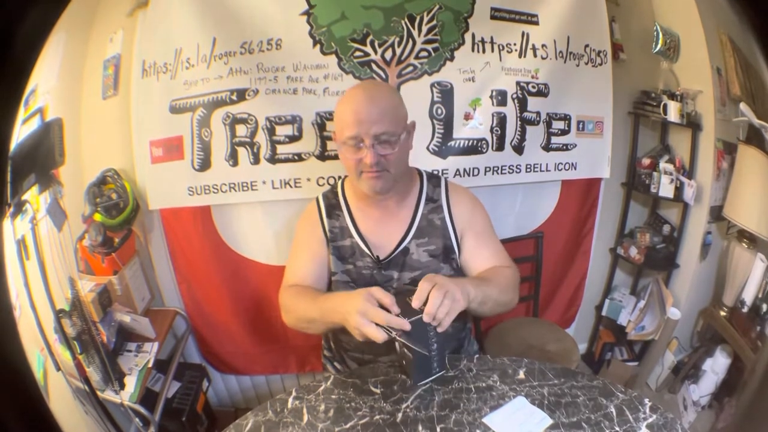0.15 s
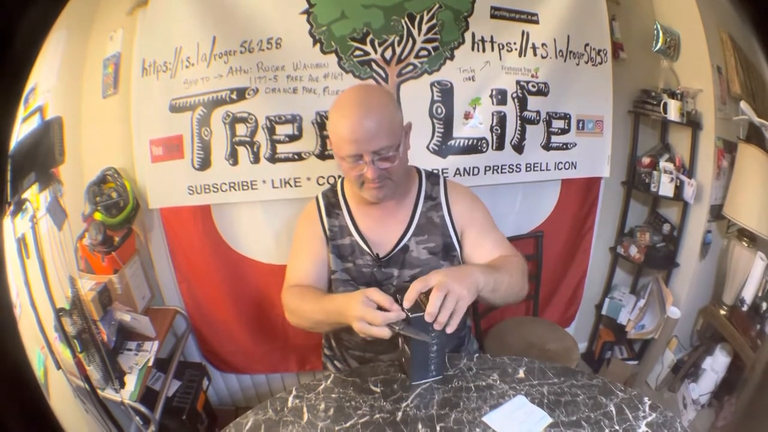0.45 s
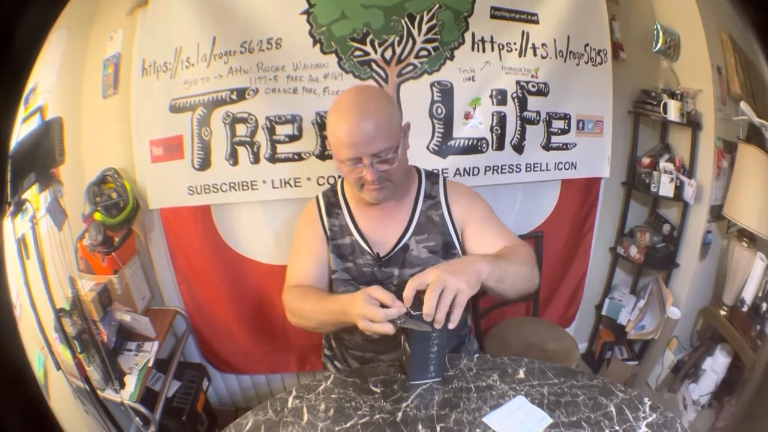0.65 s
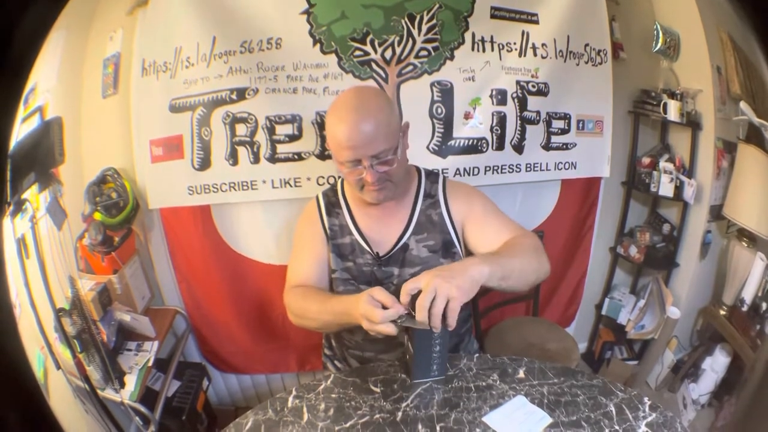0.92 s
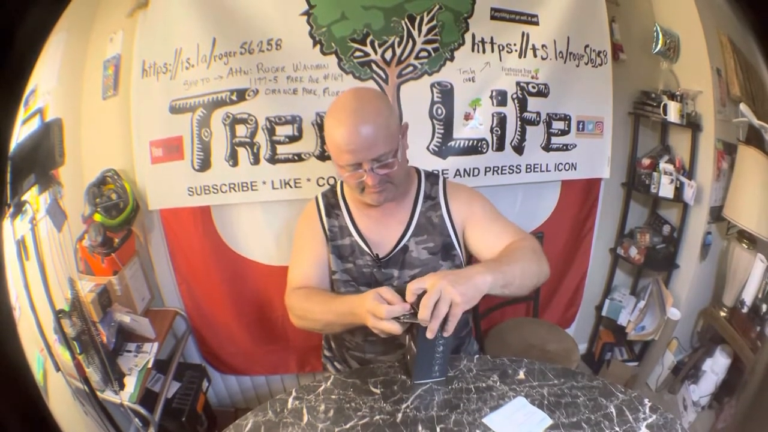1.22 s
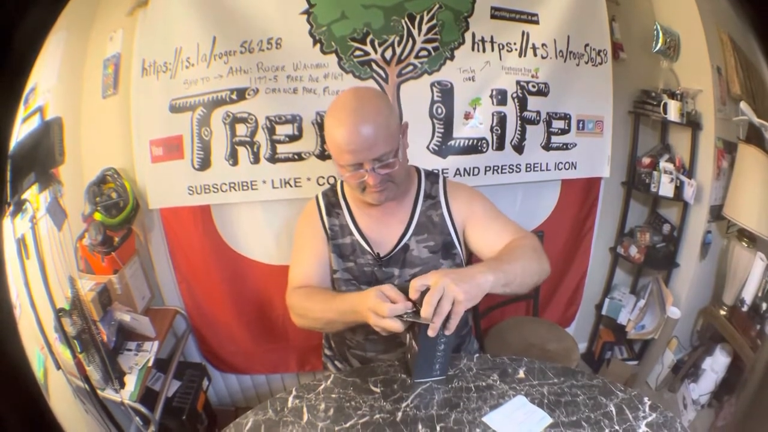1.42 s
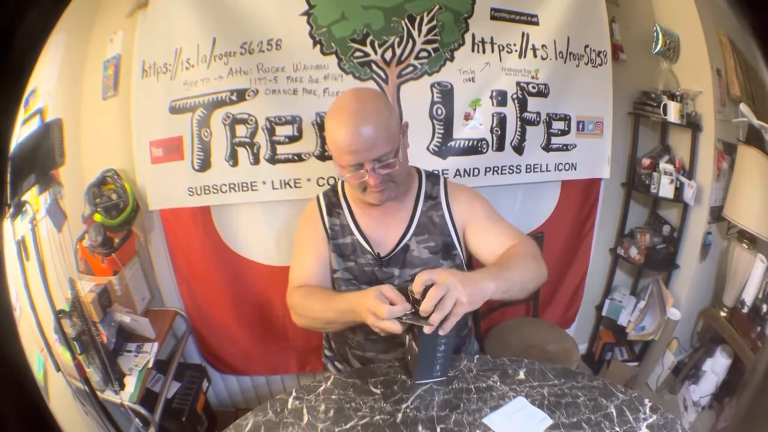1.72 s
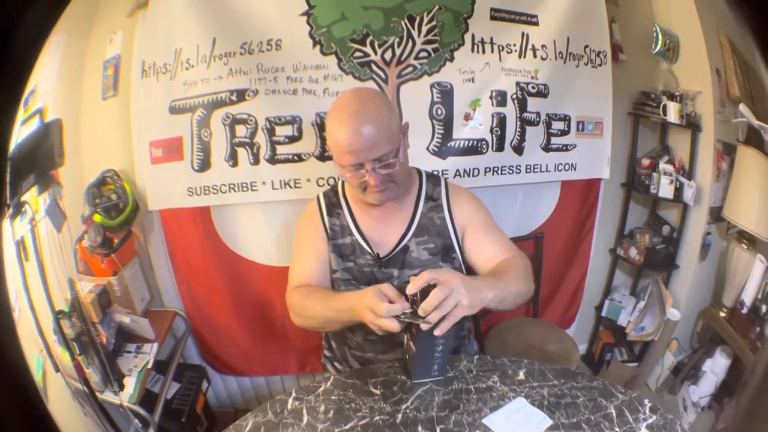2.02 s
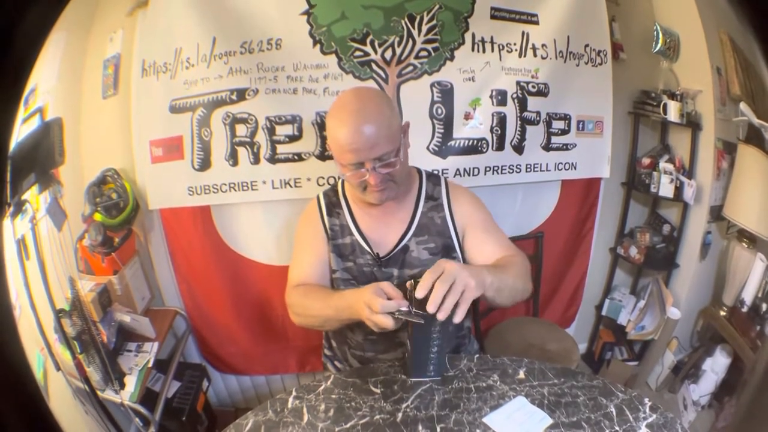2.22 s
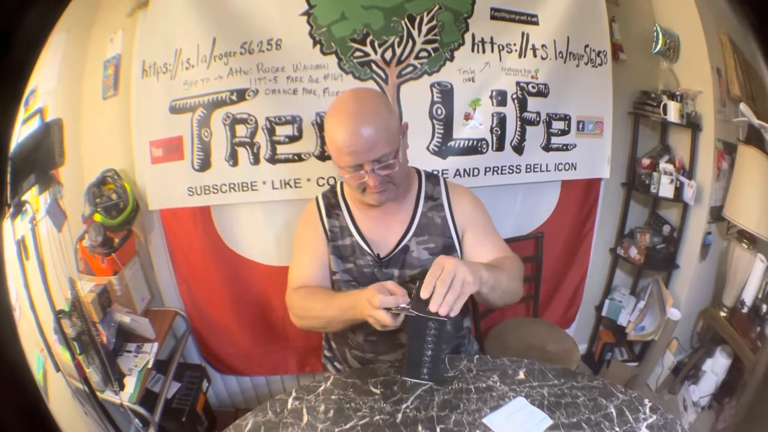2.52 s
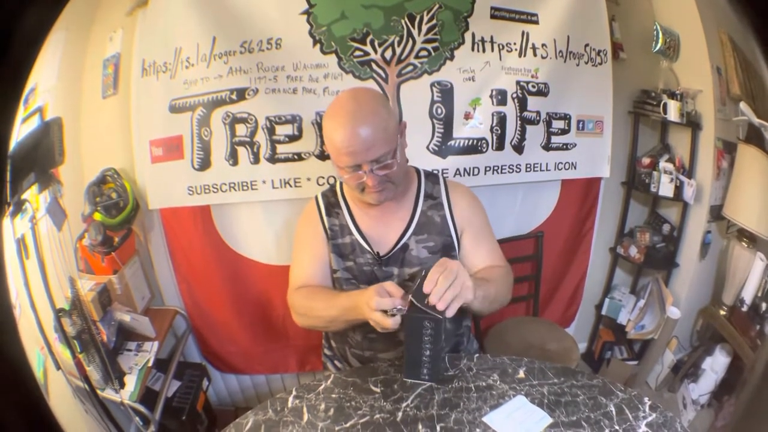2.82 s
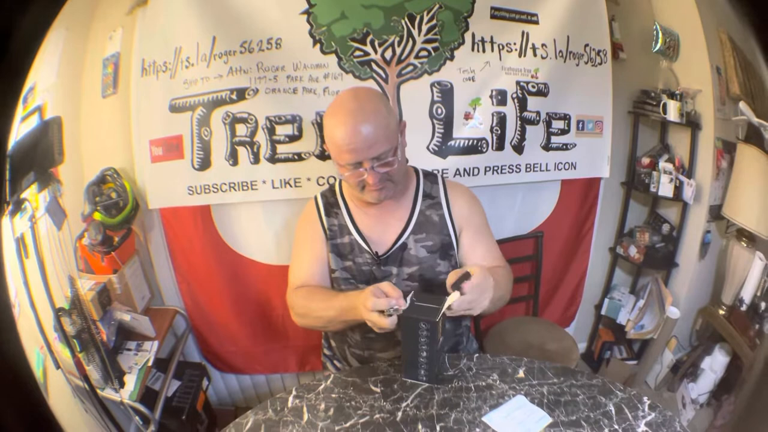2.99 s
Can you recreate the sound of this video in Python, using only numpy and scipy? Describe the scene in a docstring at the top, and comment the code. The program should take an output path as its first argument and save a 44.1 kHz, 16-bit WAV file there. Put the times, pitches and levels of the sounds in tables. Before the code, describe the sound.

A blade scratches through the seal on a cardboard box in a small room, with dry clicks and soft knocks. Sharp snaps come midway and again near the end, over a low rumble and faint hiss.

```python
"""In a small furnished room, a small blade works through the seal of a cardboard box on a table.
The blade judders as it sticks and slips, scrapes as it breaks tiny fibres, and ticks as it catches.
The box knocks dully as it shifts in the hand. The seal gives in a cluster of sharp snaps,
and a last loud snap frees the flap. A low rumble and a faint hiss lie underneath."""
import sys
import numpy as np
from scipy import signal
from scipy.fft import rfft, irfft
from scipy.io import wavfile

SR = 44100
rng = np.random.default_rng(int(sys.argv[2]) if len(sys.argv) > 2 else 0)


def dump(signal):
    """Clip the signal to [-1, 1] and save it as 16-bit WAV at the path in sys.argv[1]."""
    limited = np.clip(np.atleast_2d(signal).T, -1, 1)
    pcm = np.round(limited * 32767).astype(np.int16)
    wavfile.write(sys.argv[1], SR, pcm)


N = 138915
LEAD_S = .008  # a faint crackle swells for this long before each click


def gain(db):
    """Turns decibels into a number to multiply by."""
    return 10 ** (np.asarray(db) / 20)


def unit_level(x):
    """Scales a sound to an average (rms) level of one."""
    return x / np.sqrt(np.mean(x ** 2) + 1e-20)


def look_up(table, hz):
    """Reads between a table's rows on a log scale of pitch."""
    pitches, values = np.transpose(table)
    return np.interp(np.log(abs(hz) + 1), np.log(pitches + 1), values)


def add(mix, start_s, sound):
    """Mixes a sound in at start_s."""
    at = round(start_s * SR)
    sound = sound[max(-at, 0):]
    part = mix[max(at, 0):][:len(sound)]
    part += sound[:len(part)]


def fade(t, fade_s):
    """Dies away, falling 60 dB in fade_s."""
    return np.exp(-np.log(1000) * t / fade_s)


def ring(hz, fade_s, rise_s=0.00011):
    """One tone that starts quickly and dies away."""
    t = np.arange(SR // 4) / SR
    return np.sin(2 * np.pi * hz * t) * fade(t, fade_s) * (1 - np.exp(-t / rise_s))


def click(tone, size=4096):
    """A sudden click with the lows and highs of a tone table."""
    log_gain = np.log(gain(look_up(tone, np.fft.fftfreq(size, 1 / SR))))
    spectrum = np.exp(np.conj(signal.hilbert(log_gain)))  # packs the energy at the start
    pulse = np.fft.ifft(spectrum).real[:size // 2]
    return pulse / abs(pulse).max()


def focus(x, hz=8600, boost_db=4, width_octaves=0.24):
    """The angle of the contact favours one band of the treble."""
    octaves = np.log2((np.fft.rfftfreq(len(x), 1 / SR) + 1) / hz)
    return irfft(rfft(x) * gain(boost_db * np.exp(-(octaves / width_octaves) ** 2)), len(x))


def crackle(fade_s, spray_share):
    """A brief crackle swells into a click and dies away."""
    t = np.arange(SR // 20) / SR - LEAD_S
    shape = np.where(t < 0, gain(-4) * fade(abs(t), 0.007), fade(abs(t), fade_s))
    spray = rng.standard_normal(len(t)) * shape
    spray *= np.sqrt(spray_share) / np.linalg.norm(spray)
    spray[np.argmin(abs(t))] += np.sqrt(1 - spray_share)  # the click
    return spray


# Tone of the background: pitch_hz, level_db
BACKGROUND_TONE = [(10, 0), (30, 3), (50, -13), (85, -19.5), (120, -16.5), (170, -19), (900, -34.5),
                   (2000, -40.5), (4200, -54), (8000, -53), (16000, -59)]

def background(level_db=-36, sway_db=1.5):
    """A swaying low rumble under faint steady hiss."""
    hz = np.fft.rfftfreq(N, 1 / SR)
    spectrum = rfft(rng.standard_normal(N)) * gain(look_up(BACKGROUND_TONE, hz))
    lows = 1 / (1 + (hz / 70) ** 4)
    sway = unit_level(irfft(rfft(rng.standard_normal(N)) * np.exp(-hz / 3), N))
    rumble = irfft(spectrum * lows, N) * gain(sway_db * sway)
    hiss = irfft(spectrum * (1 - lows), N)
    return gain(level_db) * unit_level(rumble + hiss)


# The room's echo tail: pitch_hz, fade_s, level_db
ROOM_TAIL = [(150, 0.17, 1.5), (510, 0.31, 6.5), (1420, 0.25, -2.5), (3600, 0.27, 4), (6900, 0.29, -8.5),
             (15000, 0.2, 1.5)]

def room(x, early_db=-14, tail_db=-13.5):
    """Table and walls throw back early echoes, then a short tail."""
    size = SR // 2
    t = np.arange(size) / SR
    early, tail = rng.standard_normal((2, size)) * (t > 0.003)  # silent until the first echo
    early *= fade(t, 0.039)
    hz, times, bands = signal.stft(tail, SR, nperseg=256)
    fade_s, level_db = (look_up(np.array(ROOM_TAIL)[:, [0, k]], hz)[:, None] for k in (1, 2))
    tail = signal.istft(bands * gain(level_db) * fade(times, fade_s), SR)[1][:size]
    echoes = gain(early_db) * early / np.linalg.norm(early) + gain(tail_db) * tail / np.linalg.norm(tail)
    return signal.fftconvolve(x, echoes)[:N]


# Tone of a dull knock: pitch_hz, level_db
KNOCK_TONE = [(40, -24), (150, -2.5), (480, 3.5), (850, -5), (1600, -1.5), (2800, -16.5), (5000, -24),
              (16000, -38)]
# Bumps of the box: start_s, level_db
BOX_BUMPS = [(0.329, -26), (0.333, -24.5), (.905, -14.5), (.912, -15), (1.797, -16.5)]

def knocks():
    """The box shifts in the hand and bumps dully."""
    out, knock = np.zeros(N), click(KNOCK_TONE)
    for start_s, level_db in BOX_BUMPS:
        add(out, start_s - LEAD_S, gain(level_db) * signal.fftconvolve(crackle(0.02, 0.84), knock))
    return out


# Tone of tapped card: pitch_hz, level_db
CARD_TONE = [(60, 3.5), (150, -10.5), (300, 3), (600, 6.5), (850, 0), (1200, 3.5), (2000, -4), (3100, -4),
             (4200, -16), (8000, -20), (16000, -62)]
# Notes the box rings at: pitch_hz, level_db, fade_s
BOX_NOTES = [(530, -21.5, 0.026), (600, -22.5, 0.026), (1095, -30.5, 0.13), (1560, -28.5, 0.0098),
             (1924, -25, 0.022), (2540, -30, 0.0081)]

def card_click():
    """The box answers one tap with a dry click and a faint ring."""
    tap = click(CARD_TONE, size=16384)
    for pitch_hz, level_db, fade_s in BOX_NOTES:
        add(tap, 0, gain(level_db) * ring(pitch_hz, fade_s))
    return tap / abs(tap).max()


# The gliding note of the pressed side of the box: time_s, pitch_hz
PANEL_GLIDE = [(.45, 1400), (.73, 1840), (1.01, 1210), (1.16, 1650), (1.57, 1120), (2.08, 1570),
               (2.8, 1300), (3.0, 1390)]

def panel(x, width_hz=264):
    """The pressed panel rings at a pitch that shifts with the grip and the place of the blade."""
    hz = np.interp(np.arange(N) / SR, *np.transpose(PANEL_GLIDE))
    spin = np.exp(2j * np.pi * np.cumsum(hz) / SR)
    decay = np.exp(-np.pi * width_hz / SR)
    # Shift the note down to 0 Hz, smooth away the rest, and shift it back.
    ringing = 2 * (spin * signal.lfilter([1 - decay], [1, -decay], x / spin)).real
    return gain(-3.5) * x + gain(4) * ringing


# Tone of the cut edge: pitch_hz, level_db
EDGE_TONE = [(300, -10), (2000, -8.5), (3300, -12), (4800, -6), (5500, 2), (8500, 3.5), (10500, 2.5),
             (12500, -9), (15000, -8.5), (17000, -63.5)]

def edge_click():
    """A fibre breaks at the cut edge with a bright click."""
    return click(EDGE_TONE)


# Notes the blade rings at: pitch_hz, level_db
BLADE_NOTES = [(2030, -0.5), (2750, -4.5), (3270, 2), (5200, 0.5), (5600, -5.5), (6400, -11.5),
               (7800, -4.5), (8450, -6.5)]

def blade(fade_s):
    """Bright notes ring: briefly, giving each slip of the judder the same treble colour, and longer when a snap
    frees the blade."""
    return sum(gain(level_db) * ring(pitch_hz, fade_s) for pitch_hz, level_db in BLADE_NOTES)


def grains(pressure, grain, per_s, spread_db=2.5):
    """Fibres break at random, a few of them large, all louder under more pressure."""
    sizes = gain(spread_db * np.minimum(rng.exponential(1, SR), 5))
    breaks = unit_level(sizes * rng.choice([-1, 1], SR) * (rng.random(SR) < per_s / SR))
    return signal.fftconvolve(pressure * breaks[:len(pressure)], grain / np.linalg.norm(grain))


# Strokes of the blade: start_s, length_s, peak_fraction, card_db, edge_db, treble_hz
BLADE_STROKES = [(-.05, 0.42, 0.24, -66, -54, 7150), (0.155, 0.1, 0.71, -43.5, -53.5, 7500),
                 (0.273, 0.16, 0.1, -50.5, -54.5, 8300), (0.391, 0.25, 0.22, -49.5, -50, 6360),
                 (0.531, 0.29, 0.49, -49.5, -54, 8500), (0.678, 0.057, 0.69, -40.5, -46, 8300),
                 (0.812, 0.17, 0.18, -53.5, -45.5, 7860), (0.996, 0.28, 0.07, -52.5, -56, 7760),
                 (1.223, .052, 0.53, -38, -45.5, 5640), (1.545, 0.13, 0.6, -40, -43, 7000),
                 (1.717, 0.12, 0.5, -38.5, -46, 7740), (1.787, 0.39, 0.13, -51.5, -60, 7700),
                 (2.016, 0.049, 0.66, -41.5, -53, 8240), (2.074, 0.061, 0.56, -43.5, -48, 10500),
                 (2.157, 0.063, 0.81, -46.5, -55.5, 8200), (2.226, 0.082, 0.37, -41, -48.5, 8700),
                 (2.296, .12, 0.67, -51, -46, 9100), (2.405, 0.47, 0.15, -53, -60.5, 7400),
                 (2.513, 0.047, 0.8, -46.5, -48, 7400), (2.6, 0.17, 0.99, -41, -47.5, 7450),
                 (2.764, 0.04, 0.6, -34, -62, 8100), (2.855, 0.17, 0.75, -54.5, -46.5, 9000),
                 (2.98, 0.016, 0.76, -51, -37.5, 8850), (2.998, 0.15, 0.28, -76, -57, 10300)]

def scrapes(ease_s=.01):
    """Each stroke swells and eases: coarse grains scuff the card, fine ones hiss at its edge."""
    scuff, hiss = np.zeros((2, N))
    card, edge = card_click(), np.pad(edge_click(), (64, 0))
    for start_s, length_s, peak, card_db, edge_db, treble_hz in BLADE_STROKES:
        along = np.linspace(0, 1, round((length_s + 2 * ease_s) * SR))
        up_down = np.interp(along, [0, np.clip(peak, .05, .95), 1], [0, 1, 0])
        pressure = np.sin(np.pi / 2 * up_down) ** 1.58
        add(scuff, start_s - ease_s, gain(card_db) * grains(pressure, card, per_s=900))
        add(hiss, start_s - ease_s, gain(edge_db) * grains(pressure, focus(edge, treble_hz), per_s=7600))
    return panel(scuff) + hiss


# Small catches of the blade: start_s, card_db, edge_db
BLADE_CATCHES = [(.176, -22.5, -26), (.335, -28.5, -47), (0.376, -28, -39), (.468, -24.5, -51),
                 (.664, -31, -50), (0.677, -25, -38), (0.821, -28, -36), (0.93, -27, -49),
                 (1.009, -26, -33), (1.015, -20.5, -33), (1.03, -30, -46), (1.045, -27.5, -33),
                 (1.078, -31, -36), (1.109, -26.5, -25.5), (1.147, -21, -30), (1.164, -20, -27),
                 (1.182, -20, -25.5), (1.205, -21, -26.5), (1.228, -24, -31), (1.248, -23, -19),
                 (1.329, -29, -37), (1.439, -31, -39), (1.485, -30, -41), (1.498, -35, -46),
                 (1.742, -25, -22), (1.957, -26, -26), (2.011, -23.5, -22), (2.276, -18.5, -27.5),
                 (2.515, -14, -24), (2.553, -18.5, -18.5), (2.57, -18, -30), (2.72, -12, -21),
                 (2.726, -22.5, -26), (2.871, -24.5, -23), (2.979, -37, -10.5), (2.985, -38, -21.5),
                 (3.004, -47, -18.5), (3.024, -25, -46)]

def catches():
    """Each catch of the blade taps the card and clicks at the cut edge."""
    card, edge = np.zeros((2, N))
    for start_s, card_db, edge_db in BLADE_CATCHES:
        add(card, start_s - LEAD_S, gain(card_db) * crackle(fade_s=0.017, spray_share=0.63))
        add(edge, start_s - LEAD_S, gain(edge_db) * crackle(fade_s=0.0048, spray_share=1))
    body = panel(signal.fftconvolve(card, card_click())[:N])
    return body + focus(signal.fftconvolve(edge, edge_click())[:N])


def judder(start_s=0.1081, length_s=.056, first_per_s=305, last_per_s=220, swell_db=10.5):
    """The blade sticks and slips, slowing and growing louder, shaking the card and clicking at its edge, each
    slip with the same bright treble colour."""
    card, edge = np.zeros((2, N))
    t = 0
    for jitter, strength in rng.standard_normal((40, 2)):
        along = t / length_s
        if along > 1:
            break
        slip_db = swell_db * (along - 1) + 2.5 * strength
        add(card, start_s + t, -gain([0.32 * slip_db]))  # the card swells less than the edge
        add(edge, start_s + t - LEAD_S, gain(slip_db) * crackle(fade_s=.004, spray_share=1))
        t += np.exp(.12 * jitter) / (first_per_s + (last_per_s - first_per_s) * along)
    treble = gain(-32) * blade(fade_s=0.0092)
    add(treble, 0, gain(-16.5) * edge_click())
    body = gain(-20.5) * panel(signal.fftconvolve(card, card_click())[:N])
    return body + focus(signal.fftconvolve(edge, treble)[:N])


# Tone of the cracking seal: pitch_hz, level_db
CRACK_TONE = [(300, -9), (1500, 2), (3200, 0.5), (4750, -4.5), (5300, 0.5), (9500, 1.5), (12000, -6),
              (14700, -4), (17000, -46)]
# Snaps of seal and flap ("upper" is the flap's higher note):
# start_s, box_db, flap_hz, flap_db, upper_hz, upper_db, crack_hz, crack_db, thump_hz, thump_db
SEAL_SNAPS = [(1.5333, -1.5, 1144, -1.5, 1700, -1, 2760, -4.5, 251, -8),
              (1.6092, -13, 1060, -17, 1880, -23.5, 7500, -13.5, 248, -20),
              (1.6595, -36, 1283, -7, 2940, -22, 8500, -11, 418, -15),
              (1.6626, -22, 1250, -13.5, 3200, -13.5, 5650, -8.5, 312, -17),
              (1.761, -23, 1350, -15, 1810, -18, 7500, -24.5, 220, -25),
              (1.79, -18.5, 1634, -12.5, 1920, -10, 7660, -10, 205, -11.5),
              (2.7548, -5, 798, -7, 1300, -14, 6640, -6.5, 321, -11),
              (2.7576, -19, 635, -12, 1490, -8, 6400, -4, 113, -8),
              (2.7640, -16, 1111, -1.5, 1210, -1.5, 7000, -35, 110, -27)]

def snaps(flap_fade_s=0.013):
    """The seal cracks, the freed flap and the blade ring, and the air in the box thumps."""
    out, box, crack, free_blade = np.zeros(N), card_click(), click(CRACK_TONE), blade(fade_s=.13)
    for (start_s, box_db, flap_hz, flap_db, upper_hz, upper_db,
         crack_hz, crack_db, thump_hz, thump_db) in SEAL_SNAPS:
        add(out, start_s, gain(box_db) * box)
        add(out, start_s, -gain(flap_db) * ring(flap_hz, flap_fade_s))
        add(out, start_s, gain(upper_db) * ring(upper_hz, flap_fade_s))
        spray = signal.fftconvolve(crackle(fade_s=0.0037, spray_share=0.84), crack)
        add(out, start_s - LEAD_S, gain(crack_db + 9) * focus(spray, crack_hz, boost_db=8))
        add(out, start_s, gain(crack_db - 37.5) * free_blade)
        add(out, start_s, gain(thump_db) * ring(thump_hz, fade_s=0.031, rise_s=0.0029))
    return out


def scene(walls=4):
    """Blade and box in the room; a snap sprays differently towards each wall, so its tail is smooth."""
    handling = scrapes() + knocks() + catches() + judder()
    snap_tails = sum(room(snaps()) for _ in range(walls)) / np.sqrt(walls)
    return (background() + handling + room(handling) + snaps() + snap_tails)[None]


def record(dry, cutoff_hz=16200):
    """The loudest snaps overload, then the very highest treble is cut away."""
    low_pass = signal.firwin(511, cutoff_hz, window=("kaiser", 9), fs=SR)
    return signal.oaconvolve(np.clip(dry, -1, 1), low_pass[None], "same")


dry = scene()
out = record(dry)
dump(out)
```